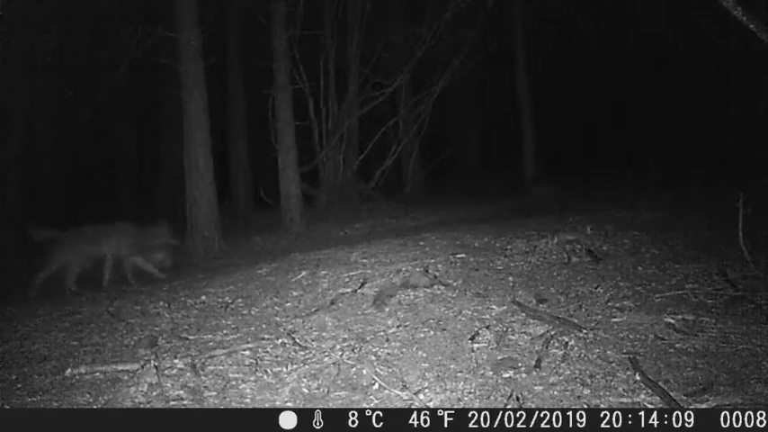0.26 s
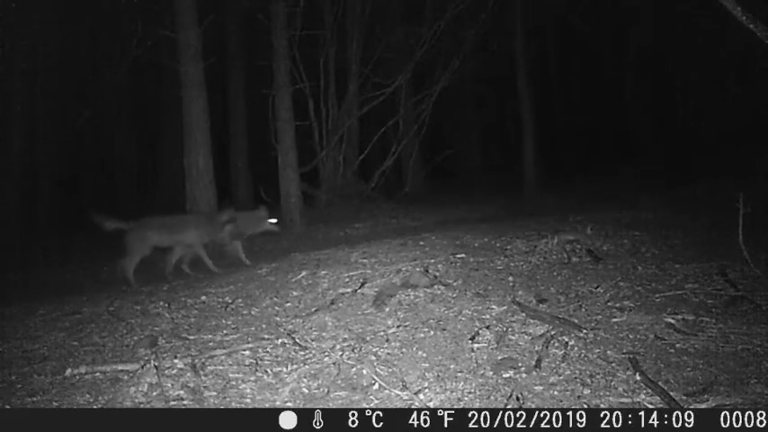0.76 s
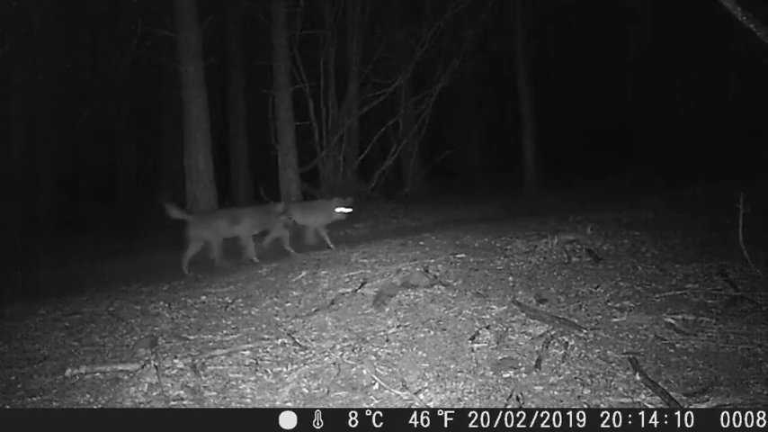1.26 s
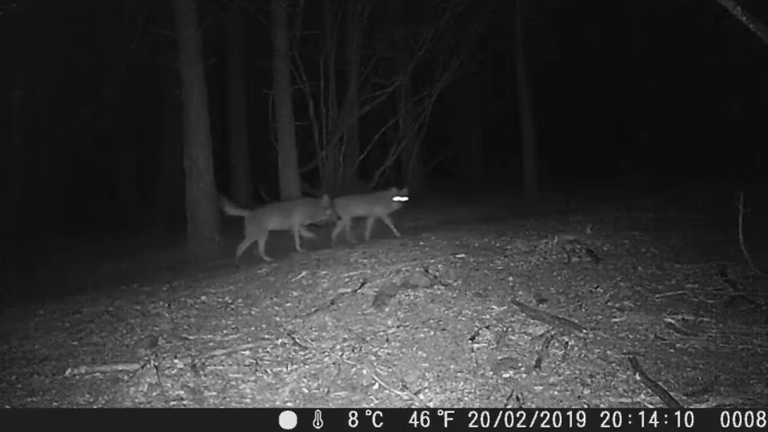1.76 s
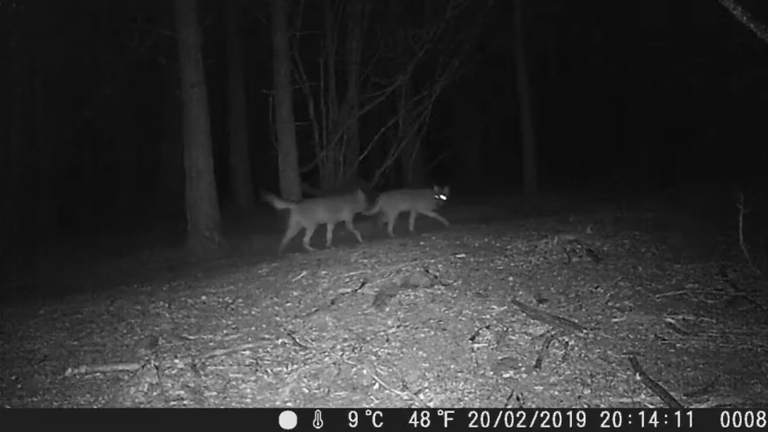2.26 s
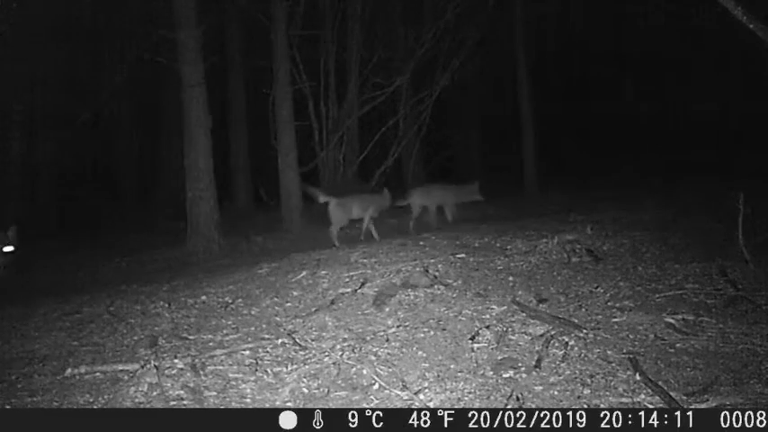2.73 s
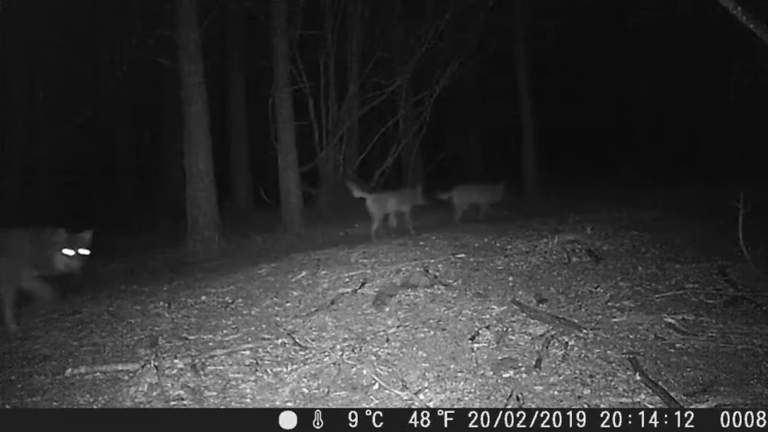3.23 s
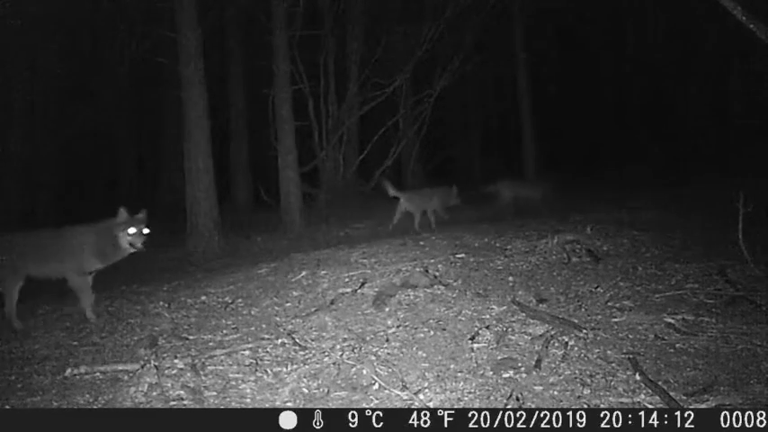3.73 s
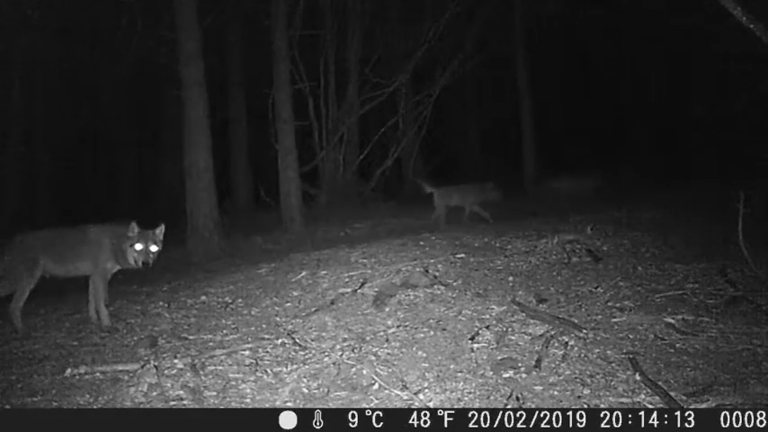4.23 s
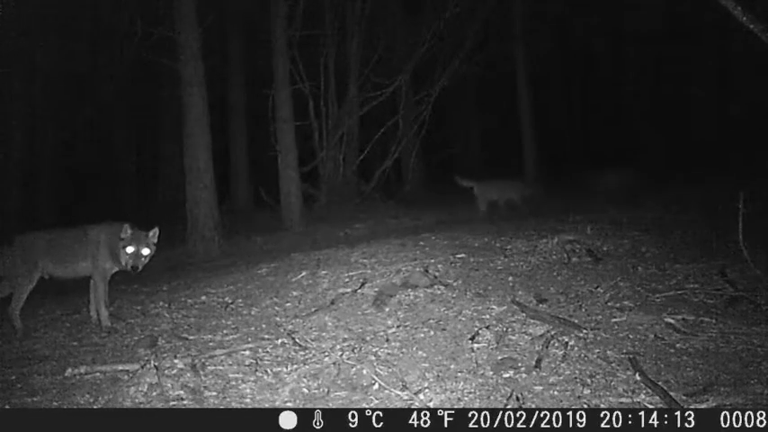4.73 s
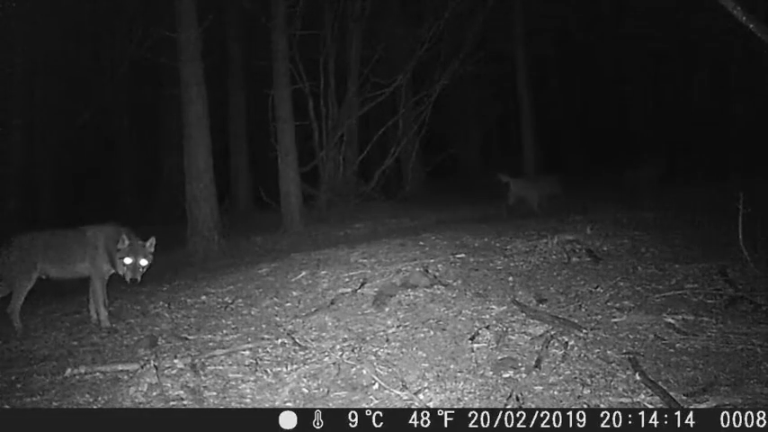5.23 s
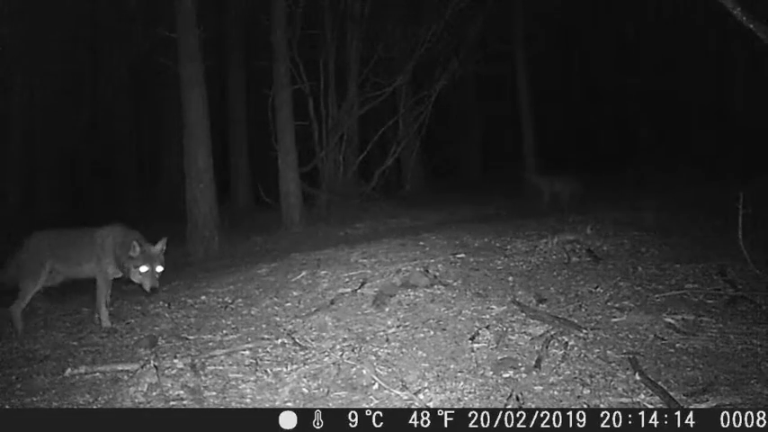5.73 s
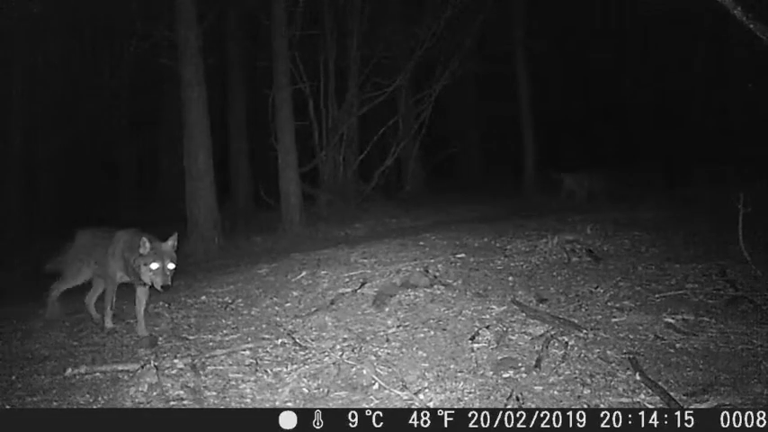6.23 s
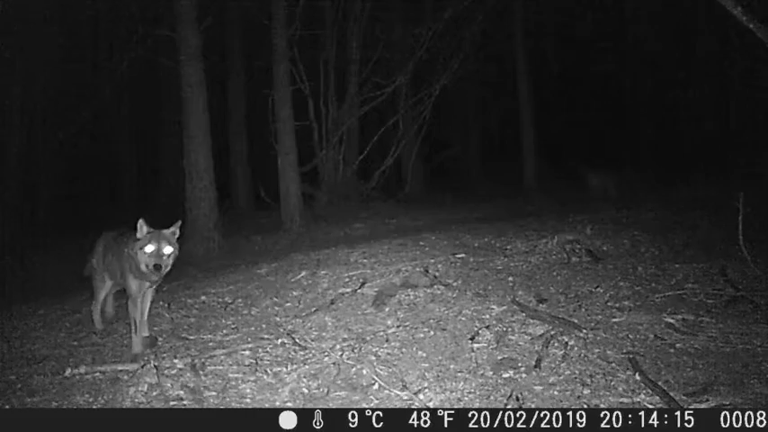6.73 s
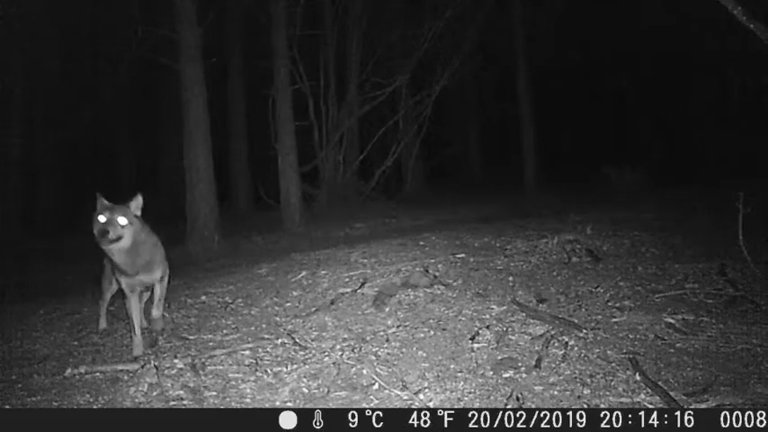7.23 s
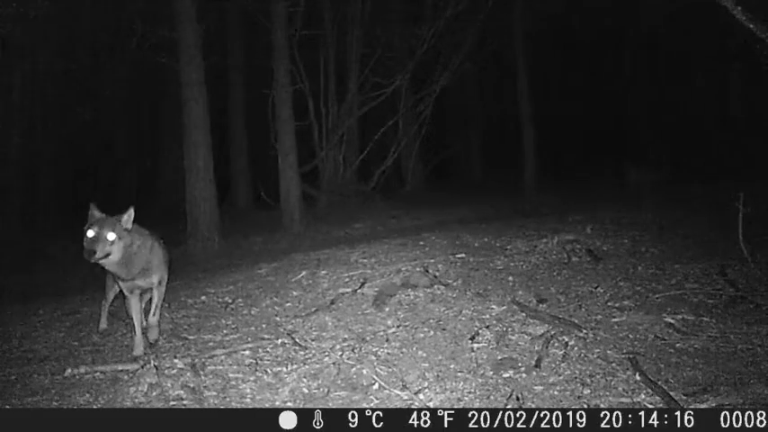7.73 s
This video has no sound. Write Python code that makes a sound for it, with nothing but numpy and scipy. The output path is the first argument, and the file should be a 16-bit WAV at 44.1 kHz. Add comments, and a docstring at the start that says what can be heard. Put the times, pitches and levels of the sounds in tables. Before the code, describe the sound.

A still wood at night, heard muffled from a small plastic box on a tree. Low distant rumble, boxy hum and soft hush underlie thin electronic hiss, ticking five times a second, and faint whistling blips. Wolves pad past with a few light leaf cracks; a dry twig snaps sharply early on. After a sparse middle, another wolf steps nearer, crunching and scuffing leaves loudly from six seconds.

```python
"""A still wood at night: far rumble and the hush of the trees, heard from a camera box strapped to a trunk.
The microphone hears them through hollow plastic, as shaped noise; the swells of a gust set their levels.
Animals pad over leaf litter: scuffs are flickering noise, cracks are sprays of splinters, one dry twig rings.
The circuit adds shaped hiss, rough ticks in four parts five times a second while they run,
short whistling blips and tiny high pips."""
import sys
import numpy as np
from scipy import signal
from scipy.fft import rfft, irfft
from scipy.io import wavfile

SR = 44100
rng = np.random.default_rng(int(sys.argv[2]) if len(sys.argv) > 2 else 0)


def log_audio(samples):
    """Write samples as a 16-bit WAV file to the path given in sys.argv[1]."""
    # one column per channel
    frames = np.atleast_2d(samples).T
    # limit to full scale, then quantise
    limited = np.clip(frames, -1, 1)
    pcm = np.round(limited * 32767).astype(np.int16)
    wavfile.write(sys.argv[1], SR, pcm)


N = 352359   # samples, about 8 s


def from_db(db):
    """Amplitude factor of a level in dB."""
    return 10 ** (np.asarray(db) / 20)


def rms_one(x):
    """Scale to an rms of 1."""
    return x / np.sqrt(np.mean(x ** 2) + 1e-20)


def coloured(spectrum):
    """Noise of rms 1, its spectrum drawn straight between points on a log frequency axis."""
    hz = np.fft.rfftfreq(N, 1 / SR) + 0.00069   # keeps the logarithm finite
    at_hz, level_db = np.transpose(spectrum)
    gain = from_db(np.interp(np.log(hz), np.log(at_hz), level_db))
    return rms_one(irfft(rfft(rng.standard_normal(N)) * gain, N))


def resonate(x, hz, width_hz):
    """One two-pole resonance."""
    r = np.exp(-np.pi * width_hz / SR)
    return signal.lfilter([1, 0, -1], [1, -2 * r * np.cos(2 * np.pi * hz / SR), r * r], x)


def drift(rate_hz):
    """Slow random wander of rms 1: noise through two equal low-pass poles, after a second to settle."""
    r = np.exp(-2 * np.pi * rate_hz / SR)
    return rms_one(signal.lfilter([1], [1, -2 * r, r * r], rng.standard_normal(N + SR))[SR:])


def band(x, low_hz, high_hz):
    """Keep one band of frequencies."""
    return signal.sosfilt(signal.butter(3, [low_hz, high_hz], "band", fs=SR, output="sos"), x)


def decay(clicks, length_s):
    """Each click starts at once and dies away exponentially."""
    return signal.lfilter([1], [1, -np.exp(-1 / (length_s * SR))], clicks + 1e-18)


def swell_and_fade(clicks, length_s):
    """Each click swells to its own height in about length_s, then fades."""
    r = np.exp(-1 / (length_s * SR))
    return signal.lfilter([np.e * (1 - r)], [1, -2 * r, r * r], clicks + 1e-18)


def housing(x):
    """Resonances and cancellations of the box as one minimum-phase response, so nothing sounds early."""
    # Resonances of the plastic box. Each row: frequency in Hz, width in Hz, level in dB.
    resonances = [(414, 340, -6.5), (685, 240, -5.5), (1024.6, 180, 0.5), (1099, 92, 2), (1220, 160, 2),
                  (1454, 530, -13), (1780, 200, -21.5), (2167, 530, -18.5), (2486, 290, -20),
                  (2842, 530, -22), (3510, 590, -30), (3800, 230, -32), (4880, 890, -40), (6230, 2000, -42),
                  (7100, 400, -35.5)]
    # Cancellations in the box. Each row: frequency in Hz, width in Hz, gain in dB.
    cancellations = [(1385, 50, -8), (1830, 50, -6), (2350, 40, -6), (3200, 50, -22), (6400, 200, -8)]
    size = 2 ** 13
    hz = np.fft.rfftfreq(size, 1 / SR)
    power = sum(from_db(2 * db) / (1 + (2 * (hz - f) / w) ** 2) ** 2 for f, w, db in resonances)
    log_gain = np.log(power) / 2
    for f, w, db in cancellations:
        log_gain = log_gain + np.log(from_db(db)) / (1 + (2 * (hz - f) / w) ** 2)
    # Folding the cepstrum onto its first half gives minimum phase.
    cepstrum = irfft(log_gain)
    cepstrum[1:size // 2] *= 2
    cepstrum[size // 2 + 1:] = 0
    response = irfft(np.exp(rfft(cepstrum)))[:size // 2]
    return signal.fftconvolve(x, response)[:len(x)]


def treble(x):
    """The part above the main housing resonance."""
    return signal.sosfilt(signal.butter(4, 1450, "high", fs=SR, output="sos"), x)


def in_time(rows):
    """Join timed rows by straight lines; one curve for each column after the time."""
    s, *columns = np.transpose(rows)
    return [np.interp(np.arange(N) / SR, s, c) for c in columns]


def rumble(deep_db, upper_db):
    """Far low noise in a deep and an upper band, each with its own level in time."""
    # Spectrum of the far rumble. Each row: frequency in Hz, relative level in dB per Hz.
    spectrum = [(7.1, -27.5), (12, -2.5), (27, -1), (74, 0), (119, -10), (167, -13.5), (253, -11.5),
                (273, -15), (312, -31.5), (420, -30), (550, -56), (920, -120)]
    low = coloured(spectrum)
    deep = from_db(deep_db) * rms_one(band(low, 16, 44))
    upper = from_db(upper_db) * rms_one(band(low, 55, 910))
    return deep + upper


def box_hum(hum_db):
    """The air inside the box rings: noise passed twice through one resonance, its level wavering."""
    hz, width_hz = 246.4, 62.3   # width of each pass
    air = resonate(resonate(rng.standard_normal(N), hz, width_hz), hz, width_hz)
    return from_db(hum_db + 1.3 * drift(4.1)) * rms_one(air)


def hush(hush_db):
    """The broad hush of the trees: flickering white noise heard through the housing."""
    share = 1.286   # amplitude factor: the hush is wider than the main housing resonance
    return from_db(hush_db + 1.8 * drift(21)) * rms_one(housing(rng.standard_normal(N))) * share


def rustle_level(gust_db):
    """A steady stir of leaves plus a quick swell and fade for every scuff, in dB."""
    # Paws scuff through the litter. Each row: peak time in seconds, level in dB, fade constant in seconds.
    scuffs = [(0.15, -70, .025), (0.339, -70, .015), (0.452, -69, .02), (0.579, -77, .07),
              (2.432, -74.5, .07), (4.341, -75.5, .07), (4.836, -73.5, .07), (5.871, -75.5, .08),
              (6.081, -66.5, .07), (6.45, -63.5, .08), (6.7, -64.5, .08), (7.032, -71, .06),
              (7.28, -68.5, .08), (7.561, -66.5, .08), (7.79, -66, .08)]
    stir_db, gust_share = -80, .7   # stir in still air; share of the gust's swing it follows
    rise_share = .8   # the swell is this share of the fade
    t = np.arange(N) / SR
    power = from_db(stir_db + gust_share * gust_db) ** 2
    for s, level_db, length_s in scuffs:
        since_peak = np.maximum((s - t) / rise_share, t - s)
        power = power + (from_db(level_db) * np.exp(-since_peak / length_s)) ** 2
    return 10 * np.log10(power)


def rustle(rustle_db):
    """Leaves scuff in soft grains; each band of the scuff also flickers on its own."""
    edges_hz = [1400, 1850, 2350, 3200, 4400, 6400]
    loudest_db = 9   # ceiling of the flicker
    white = housing(rng.standard_normal(N))
    together_db = 6.0 * drift(24)
    bands = []
    for low_hz, high_hz in zip(edges_hz, edges_hz[1:]):
        flicker_db = np.minimum(together_db + 4.9 * drift(30), loudest_db)
        bands.append(band(white, low_hz, high_hz) * from_db(flicker_db))
    return from_db(rustle_db) * rms_one(sum(bands))


def crackle(rustle_db):
    """Tiny leaf edges break at random, each in a treble band of its own, in step with the rustle."""
    grains_per_s, length_s = 30, .003   # grains in each band; decay constant
    under_rustle_db = -18.5
    edges_hz, out = [3300, 4300, 5400, 6400, 7300], 0
    for low_hz, high_hz in zip(edges_hz, edges_hz[1:]):
        clicks = (rng.random(N) < grains_per_s / SR) * from_db(rng.uniform(-6, 6, N))
        out = out + band(decay(clicks, length_s) * rng.standard_normal(N), low_hz, high_hz)
    return from_db(rustle_db + under_rustle_db) * rms_one(out)


def hiss():
    """The circuit's own steady noise, shaped by its spectrum."""
    # Spectrum of the hiss. Each row: frequency in Hz, relative level in dB per Hz.
    spectrum = [(1940, -33.5), (3300, -11), (3820, -3.5), (4230, -6), (4500, -8.5), (5490, -10),
                (6340, -10), (6900, 1.5), (7280, -11.5), (9460, -50), (16000, -120)]
    return from_db(-90.5) * coloured(spectrum)


def ticks(uneven_db=1.3, slip_s=.002):
    """Bursts of current noise through a few steep resonances; the later parts of a burst slip in time."""
    # Runs of circuit ticks. Each row: first tick in seconds, end in seconds.
    runs = [(0.041, 2.3), (2.4261, 7.9)]
    # Resonances of a tick. Each row: frequency in Hz, width of each pass in Hz, level in dB.
    resonances = [(3880, 420, 0), (5500, 300, -6), (7050, 400, -16), (2900, 900, -10)]
    # Parts of one tick. Each row: delay in seconds, level in dB, decay constant in seconds.
    parts = [(0, -72, 0.0044), (.010, -85, 0.013), (0.021, -73.5, 0.004), (.042, -82, .004)]
    every_s, fade_db_per_s = 0.2, 0.53
    starts = np.concatenate([np.arange(a, b, every_s) for a, b in runs])
    slips = rng.normal(0, slip_s, (len(starts), len(parts)))
    out = 0
    for hz, width_hz, level_db in resonances:
        shape = 0
        for (delay, part_db, length_s), slip in zip(parts, slips.T):
            clicks = np.zeros(N)
            at = ((starts + delay + slip * (delay > 0)) * SR).astype(int)
            tick_db = part_db + level_db - fade_db_per_s * starts + rng.normal(0, uneven_db, len(at))
            clicks[at] = from_db(tick_db)
            shape = shape + decay(clicks, length_s)
        white = rng.standard_normal(N)
        pair = np.array([white, shape * white])
        steady, burst = resonate(resonate(pair, hz, width_hz), hz, width_hz)
        out = out + burst / steady.std()   # the steady noise sets the scale
    return out


def small_cracks(rustle_db):
    """Small cracks scattered by chance in step with the rustle: rows of seconds, level and brightness in dB."""
    count, over_rustle_db, bright_db = 22, 13, -1
    share, where = np.cumsum(from_db(2 * rustle_db)), rng.random(count)
    at = np.searchsorted(share, where * share[-1])
    spread = rng.uniform(-1, 1, (count, 2))
    levels_db = rustle_db[at] + over_rustle_db + 2.5 * spread[:, 0]
    return list(zip(at / SR, levels_db, bright_db + 4.0 * spread[:, 1]))


def cracks(rustle_db, splinter_s=0.0042, soft_hz=3300, count=500):
    """Each crack is a spray of splinters a few milliseconds long, dulled by the damp litter."""
    # Twigs and leaves under the paws. Each row: start in seconds, level in dB, brightness in dB.
    paw_cracks = [(0.1275, -51.5, -4), (0.1535, -62.5, 5), (0.336, -51.5, -2.5), (0.4514, -49.5, -4),
                  (0.554, -48.5, -35), (3.5815, -48, -18), (3.6576, -60, 3.5), (3.7752, -50, -30),
                  (3.8264, -47.5, -30), (4.0689, -45.5, -30), (4.0914, -49.5, -28), (4.6752, -53.5, -2.5),
                  (4.815, -50.5, -27), (5.5939, -55.5, -7), (5.6241, -56.5, 2), (6.0533, -40.5, -5.5),
                  (6.105, -32.5, -4.5), (6.2804, -41.5, -4.5), (6.4233, -39, -4), (6.4517, -55, 7),
                  (6.486, -39, -5), (6.5326, -43, -2), (6.6236, -42, 2.5), (6.6682, -35.5, -9.5),
                  (6.6882, -33.5, -8.5), (6.8119, -51.5, 4), (6.8337, -49, -7.5), (6.999, -54, -3),
                  (7.0264, -46.5, -1.5), (7.265, -49.5, -0.5), (7.5273, -41, -3.5), (7.5602, -54, -7),
                  (7.625, -37.5, -2.5), (7.6819, -53.5, 3.5), (7.7228, -48, -4), (7.85, -53, 0)]
    twig_hz, twig_width_hz = 1700, 90   # dry twigs ring here
    rows = paw_cracks + small_cracks(rustle_db)
    out = np.zeros(N + count)
    t = np.arange(count) / SR
    envelope = np.clip(t / 0.00023, 0, 1) * np.exp(-t / splinter_s)
    spray = rng.standard_normal((len(rows), count)) * envelope
    soft = signal.sosfilt(signal.butter(2, [700, soft_hz], "band", fs=SR, output="sos"), spray)
    tail = np.zeros(2 * count)   # room to ring out
    for (s, level_db, bright_db), burst, raw in zip(rows, soft, spray):
        boxed = housing(np.r_[burst, tail])
        bright = treble(boxed)
        bright = bright + from_db(-25.5) * resonate(bright, twig_hz, twig_width_hz)
        bright = bright + from_db(6.5) * band(boxed, 1900, 3600)   # dry leaves are crisp
        dull = signal.lfilter(*signal.butter(1, [850, 1450], "band", fs=SR), boxed)
        spark = band(np.r_[raw, tail], 3300, 7300)   # bypasses the housing
        sound = dull / np.abs(dull).max()
        sound = sound + from_db(bright_db + 3.0) * bright / np.abs(bright).max()
        sound = sound + from_db(bright_db - 25.5) * spark / np.abs(spark).max()
        i = round(s * SR)
        out[i:i + len(sound)] += from_db(level_db - 1.5) * sound[:len(out) - i]
    return out[:N]


def pips():
    """Very short high tones from the circuit, each with a quick swell and fade."""
    # Tiny pips. Each row: start in seconds, peak of the swell in dB.
    rows = [(0.3919, -74), (2.1111, -79), (2.3699, -78), (2.9721, -75), (3.2459, -78), (3.3767, -75),
            (5.2674, -74), (7.2644, -85), (7.4369, -78), (7.7199, -72)]
    pip_hz, length_s = 4890, 0.0011
    s, peak_db = np.transpose(rows)
    clicks = np.zeros(N)
    clicks[(s * SR).astype(int)] = from_db(peak_db)
    return swell_and_fade(clicks, length_s) * np.sin(2 * np.pi * pip_hz * np.arange(N) / SR)


def blip_times(count=12):
    """Within a run the blips follow each other at uneven gaps; those past its end are silenced."""
    # Runs of whistling blips. Each row: first blip in seconds, end in seconds, level in dB.
    runs = [(0.652, 0.92, -74.5), (1.131, 1.4, -73.5), (1.497, 1.93, -71.5), (2.059, 2.41, -65.5),
            (2.603, 2.73, -68.5), (2.843, 3.05, -71.5), (3.178, 3.44, -67), (4.189, 4.26, -71),
            (4.563, 4.58, -64), (5.685, 5.99, -69)]
    every_s = .07   # mean gap
    first, until, run_db = np.transpose(runs)[:, :, None]
    gaps = every_s * rng.uniform(.4, 1.6, (len(first), count))
    s = first + np.cumsum(gaps, axis=1) - gaps[:, :1]
    level_db = np.where(s < until, run_db + rng.uniform(-5, 2, s.shape), -200)
    return s.ravel(), level_db.ravel()


def blips(length_s=0.0038, waver_hz=25, again_s=0.027, again_db=-3):
    """Thin wavering tones of some twenty milliseconds; each stutters once more, so that they run together."""
    # Tones of a blip. Each row: centre frequency in Hz, level in dB.
    tones = [(2438, -1), (1585, -3.5)]
    s, blip_db = blip_times()
    stutter = again_s * rng.uniform(0.49, 1.68, len(s))
    out = 0
    for hz, tone_db in tones:
        level_db = blip_db + tone_db
        clicks = np.zeros(N)
        clicks[(s * SR).astype(int)] = from_db(level_db + rng.normal(0, 2.6, len(s)))
        again = ((s + stutter) * SR).astype(int)
        clicks[again] = from_db(level_db + again_db + rng.normal(0, 1.5, len(s)))
        phase = 2 * np.pi * np.cumsum(hz + waver_hz * drift(30)) / SR
        out = out + swell_and_fade(clicks, length_s) * np.sin(phase)
    return out


def snap(break_s=.0025):
    """One dry twig breaks for a few milliseconds: its ring swells, then dies; a bright spray goes with it."""
    # Ringing modes of the twig. Each row: frequency in Hz, level in dB, time to fall by 60 dB in seconds.
    modes = [(1215, -4, 0.019), (1004, -14, 0.031), (2420, -20.5, 0.0048), (3370, -31, 0.023)]
    start_s, snap_db, spray_db = 1.1827, -33, -34.5   # the spray's level is relative to the snap
    t = np.arange(N) / SR - start_s
    spray = rms_one(band(rng.standard_normal(N), 2600, 6200))
    out = from_db(snap_db + spray_db) * spray * (t > 0) * (t < 2 * break_s)
    for hz, level_db, t60 in modes:
        swell = np.clip(t / break_s, 0, 1) * from_db(-60 * np.clip(t - break_s, 0, 1) / t60)
        out += from_db(snap_db + level_db) * swell * np.sin(2 * np.pi * hz * t + np.pi)
    return out


def scene():
    """The wood as heard inside the box, plus the circuit; a gust moves the levels of the wood."""
    # The wood swells as a gust comes up. Each row: time in seconds, hush of the trees in dB before its
    # share and waver, hum in the box in dB before its waver, upper far rumble in dB before its waver.
    gust = [(0, -68, -65, -59.5), (0.5, -67.5, -60, -59.5), (0.85, -71, -61, -58.5),
            (1.55, -71.5, -65, -56.5), (2.2, -68, -58.5, -55.5), (2.85, -67.5, -60.5, -57.5),
            (3.2, -67.5, -55.5, -60), (3.65, -65, -62, -57), (4.1, -67.5, -65.5, -58),
            (4.6, -66.5, -62, -60), (5.4, -65.5, -62, -56.5), (5.9, -64, -55, -55),
            (6.15, -57.5, -55.5, -55), (6.45, -57, -53, -53), (6.65, -56.5, -48, -55), (7.1, -59, -55, -52),
            (7.4, -59.5, -54.5, -55), (7.99, -57.5, -55.5, -53.5)]
    hush_db, hum_db, upper_db = in_time(gust)
    gust_db = hush_db + 68   # above the hush of still air
    deep_db = -57 + 0.71 * gust_db + 2.5 * drift(1.5)   # still air, share of the gust, chance
    upper_db = upper_db + 1.33 * drift(2.4)
    rustle_db = rustle_level(gust_db)
    distance = rumble(deep_db, upper_db) + box_hum(hum_db) + hush(hush_db)
    litter = rustle(rustle_db) + crackle(rustle_db) + cracks(rustle_db) + snap()
    circuit = hiss() + ticks() + pips() + blips()
    return (distance + litter + circuit)[None]


def record(dry):
    """The top is cut by two steep low-passes; a trace of the converter's flat rounding noise is added."""
    cutoff_hz, rounding_db = 7434, -101
    cut = signal.sosfilt(signal.cheby2(16, 12, cutoff_hz, fs=SR, output="sos"), dry)
    cut = signal.sosfilt(signal.ellip(8, .5, 60, cutoff_hz, fs=SR, output="sos"), cut)
    return cut + from_db(rounding_db) * rng.standard_normal(dry.shape)


dry = scene()
out = record(dry)
log_audio(out)
```